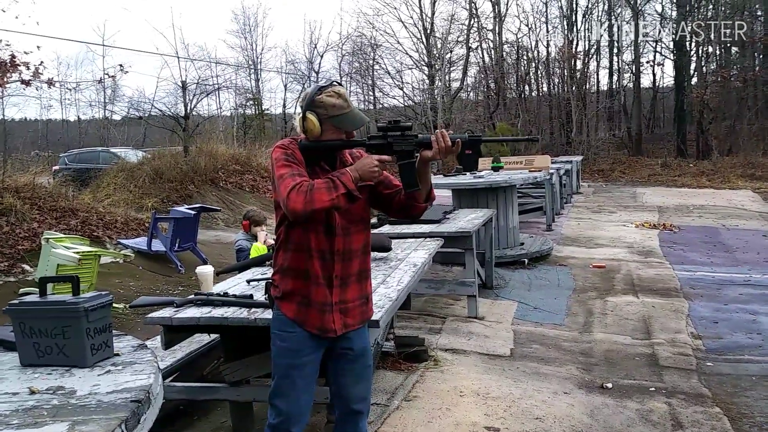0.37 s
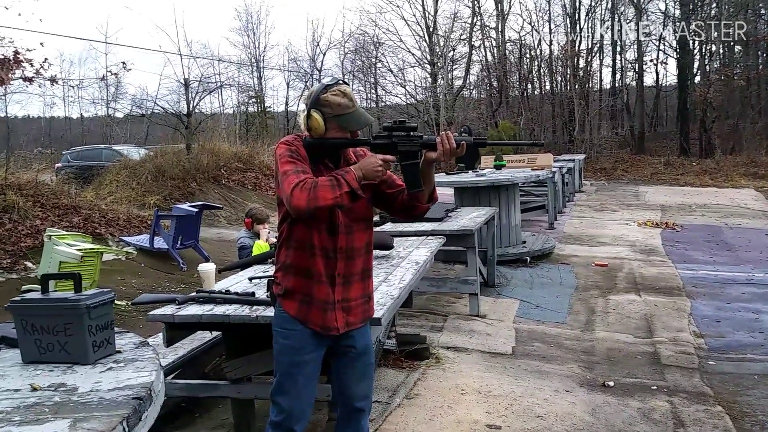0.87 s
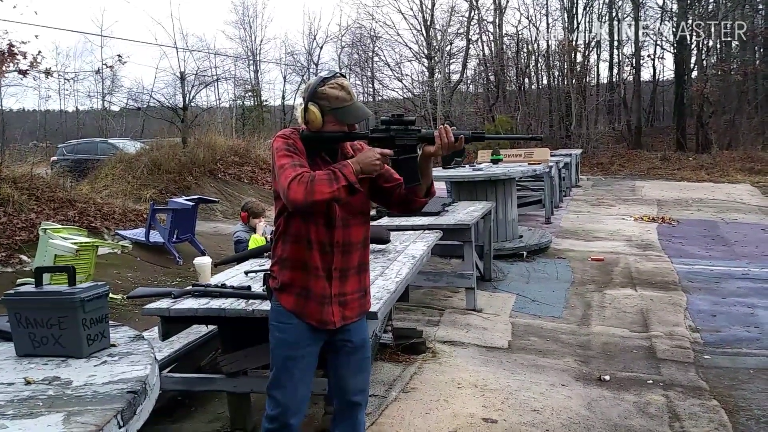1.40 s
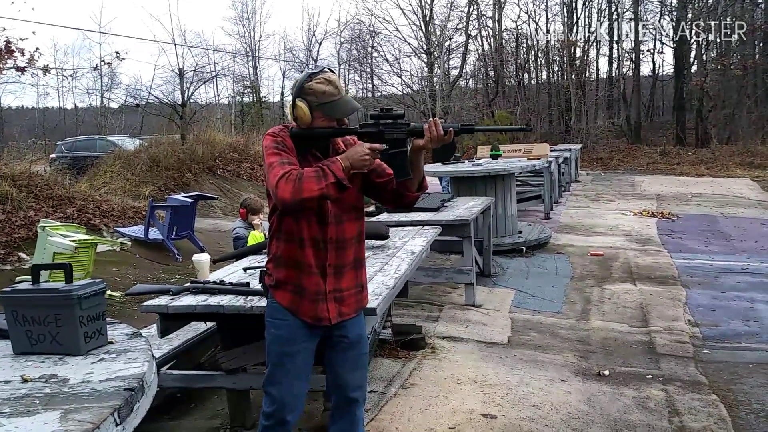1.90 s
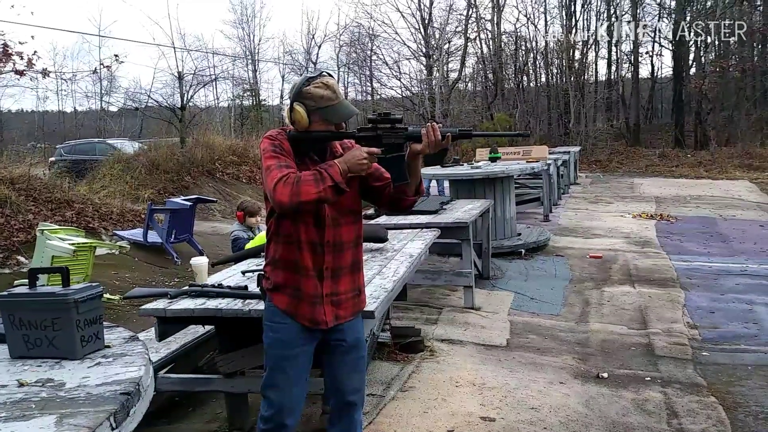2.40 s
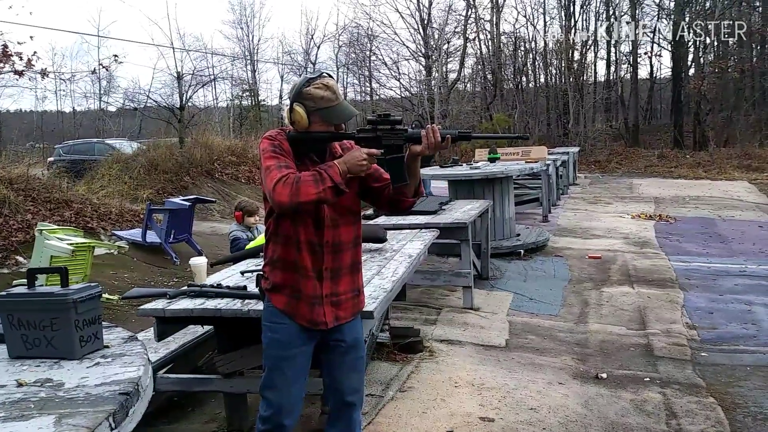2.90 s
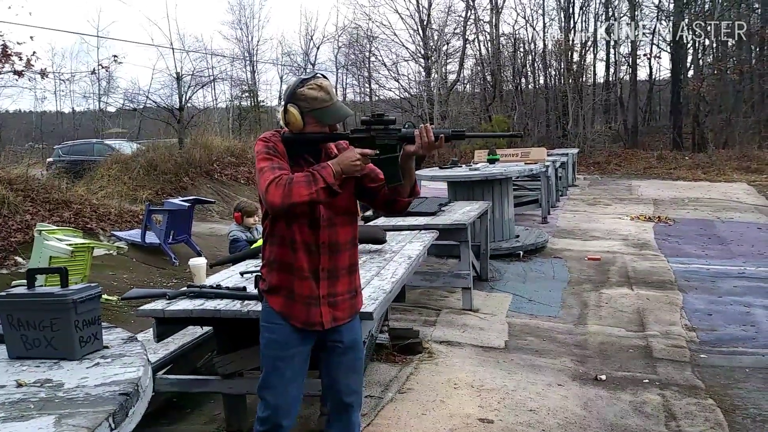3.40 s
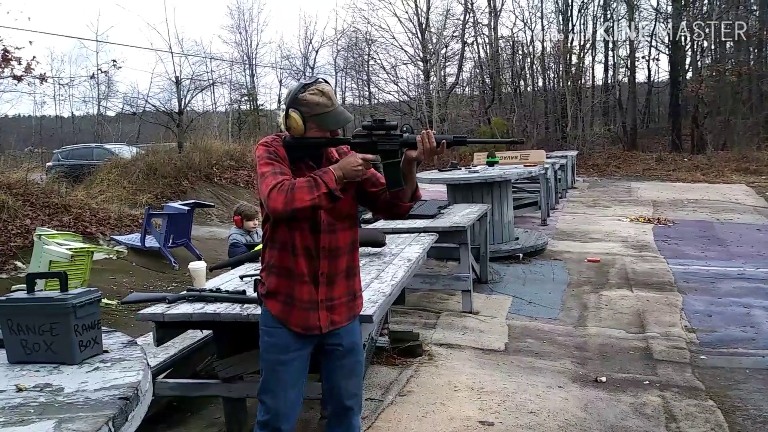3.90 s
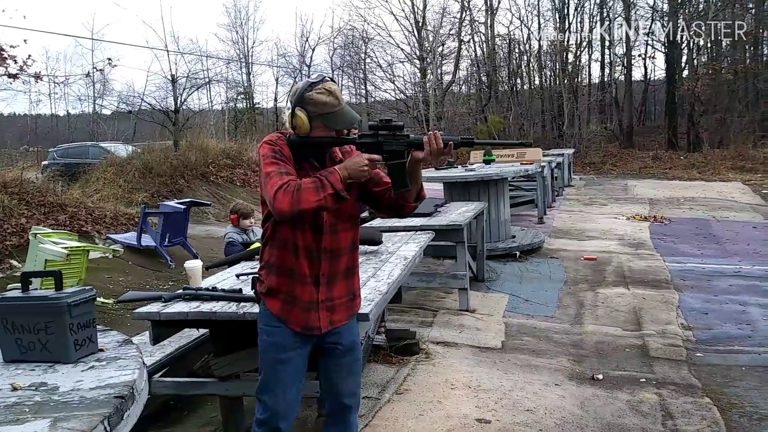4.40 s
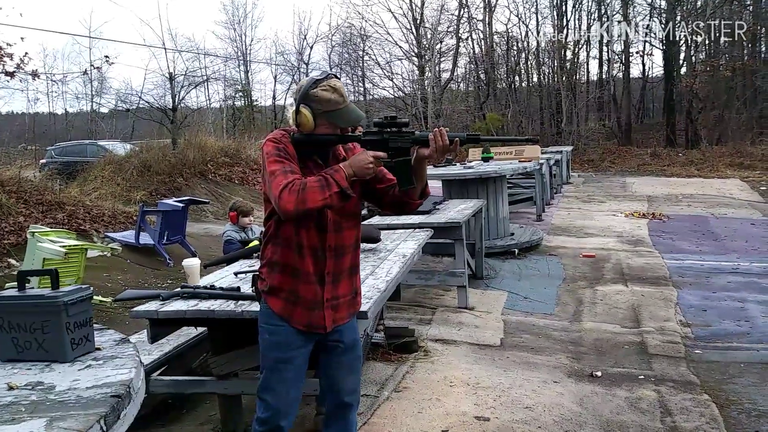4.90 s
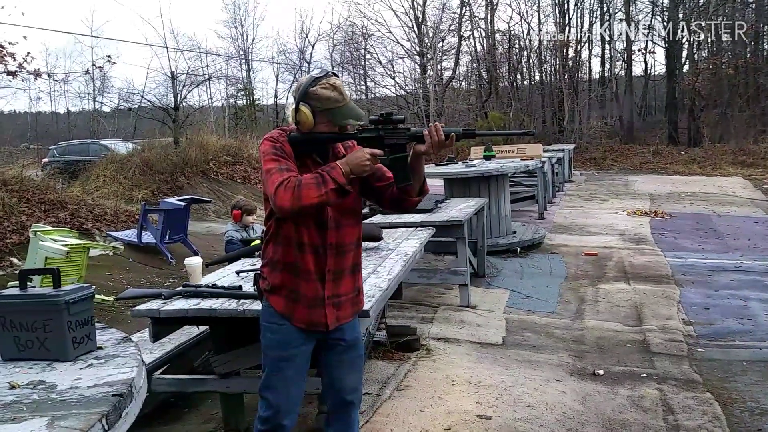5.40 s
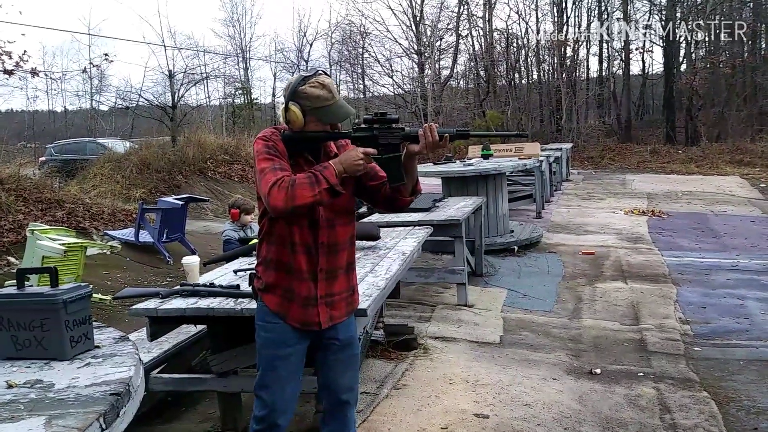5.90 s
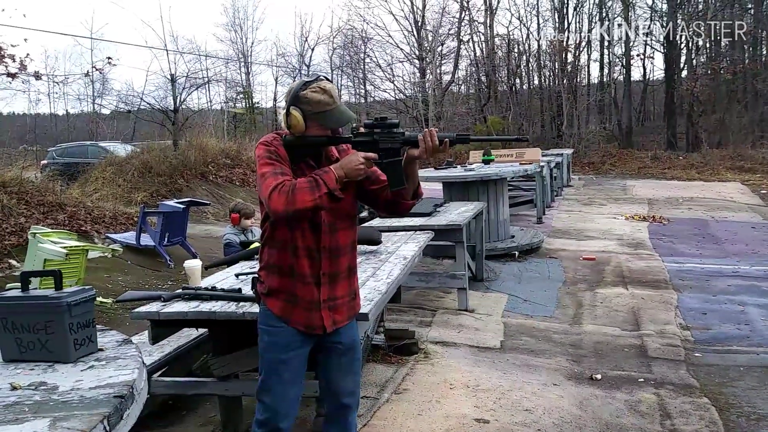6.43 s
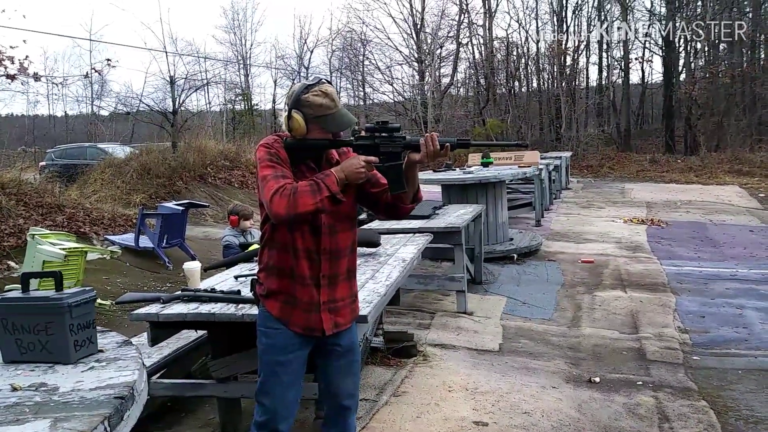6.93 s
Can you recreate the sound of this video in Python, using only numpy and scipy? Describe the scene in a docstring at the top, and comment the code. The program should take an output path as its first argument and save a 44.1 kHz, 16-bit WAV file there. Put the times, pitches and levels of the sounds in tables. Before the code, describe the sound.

Outdoors at a shooting range edged by woods, a rifle fires four separate shots, the last two close together. Each hard crack overloads the microphone, then rolls away as a throbbing, darkening echo off the trees. Small metal clicks and cloth rustles come before the first shot; ejected brass cases knock on a wooden bench and tick on concrete afterwards. Wind bumps the microphone softly over a faint distant wash.

```python
"""A rifle fires four times on an open range ringed by woods: a sharp pressure front, then shaped noise
as the long echo off the trees, duller the farther it has travelled. Brass cases land on bench and
concrete as noise ticks and ringing modes; metal clicks and cloth rustles come from the shooter.
Swells of low noise at the mono microphone are wind gusts and, under the shots, the deep part of the
blast; a far-off wash lies below, and two knocks fall close beside the microphone.
The blasts overload the microphone and a limiter holds the peaks."""
import sys
import numpy as np
from scipy import signal
from scipy.fft import rfft, irfft
from scipy.io import wavfile
from scipy.ndimage import uniform_filter1d, minimum_filter1d

SR = 44100
rng = np.random.default_rng(int(sys.argv[2]) if len(sys.argv) > 2 else 0)


def dump(signal):
    """Clip the signal to [-1, 1] and save it as 16-bit WAV at the path in sys.argv[1]."""
    limited = np.clip(np.atleast_2d(signal).T, -1, 1)
    pcm = np.round(limited * 32767).astype(np.int16)
    wavfile.write(sys.argv[1], SR, pcm)


def field_ratio(decibels):
    """Amplitude ratio for a level in dB (20 dB per decade); scalars and array-likes work."""
    return 10 ** (np.asarray(decibels, dtype=float) / 20)


N = 310895  # length in samples


def evened(x):
    """Scales to rms 1."""
    return x / np.sqrt(np.mean(x ** 2) + 1e-20)


def read(points, hz):
    """Reads a spectrum table on a log-frequency axis."""
    f, value = np.transpose(points)
    return np.interp(np.log(hz + 1), np.log(f + 1), value)


def add(mix, s, sound):
    """Mixes a sound in at s seconds, cut off at the end of the mix."""
    part = mix[round(s * SR):][:len(sound)]
    part += sound[:len(part)]


def coloured(x, points):
    """Filters by a spectrum, keeping the level of white noise."""
    gain = field_ratio(read(points, np.fft.rfftfreq(len(x), 1 / SR)))
    return irfft(rfft(x) * evened(gain), len(x))


def hump(x, centre, width):
    """A bell curve of height 1."""
    return np.exp(-.5 * ((x - centre) / width) ** 2)


def ring(modes, chance):
    """A blow sets off dying modes; chance puts each a little off in pitch and strength."""
    t = np.arange(SR // 3) / SR
    total = np.zeros(len(t))
    for (hz, db, t60), c in zip(modes, chance):
        decay = field_ratio(db + 2 * c - 60 * t / t60)
        total += decay * np.sin(2 * np.pi * hz * (1 + .002 * c) * t)
    return total * np.minimum(t / .0004, 1)


def burst(t60):
    """A rough contact: noise that dies fast, energy 1."""
    t = np.arange(SR // 20) / SR
    x = rng.standard_normal(len(t)) * field_ratio(-60 * t / t60) * np.minimum(t / 0.0012, 1)
    return x / np.linalg.norm(x)


# colour of the distant wash and the microphone hiss: f/Hz, relative level/dB per Hz
FAR_COLOUR = [(30, -31), (80, -10), (250, -6.5), (600, -2.5), (1500, -9.5), (2100, -15.5), (2800, -27.5),
              (6000, -28), (7800, -32.5), (9500, -32.5), (11500, -42), (15500, -38.5)]


def far():
    """A smooth far-off wash with the microphone's hiss: noise whose level swells slowly."""
    t = np.arange(N) / SR
    swell = np.zeros(N)
    for f in np.geomspace(.2, 3, 12):
        swell += np.sin(2 * np.pi * (f * t + rng.random())) / np.sqrt(f)
    level_db = -48 + 0.72 * evened(swell)
    return field_ratio(level_db) * coloured(rng.standard_normal(N), FAR_COLOUR)


# low-noise swells at the microphone, wind gusts and, under the shots, the deep part of the blast:
# start t/s, length t/s, level at the start/dB
LOW_SWELLS = [(0.01, 0.036, -38), (0.111, 0.1, -28.5), (0.261, 0.056, -32.5), (.345, 0.066, -37),
              (0.586, .03, -36), (0.627, 0.021, -21), (0.678, .06, -35), (0.954, 0.071, -46),
              (1.06, .03, -40.5), (1.108, .09, -38), (1.33, .19, -40.5), (1.551, .05, -38),
              (1.818, .04, -31), (2.28, 0.074, -36.5), (2.784, .14, -47.5), (2.993, .2, -40),
              (3.468, .03, -28), (3.82, .04, -42), (4.142, 0.14, -33), (4.299, .04, -28),
              (4.461, .03, -38.5), (4.558, 0.19, -29.5), (4.951, 0.25, -47), (5.303, .1, -50),
              (5.619, .03, -31), (5.875, 0.037, -37), (5.94, .09, -42), (6.058, 0.08, -36), (6.3, .05, -44),
              (6.59, .04, -33), (6.705, .03, -35.5)]


def low_level(t):
    """Low-noise level in dB: each swell rises fast, sags while it lasts and drops back to the calm."""
    calm_db = -56
    rise, sag, fall = 502.5, 24.5, 398.5  # dB per s; after the swell the fall adds to the sag
    power = field_ratio(2 * calm_db)
    for s, length, db in LOW_SWELLS:
        before, after = np.maximum(s - t, 0), np.maximum(t - s, 0)
        over = np.maximum(t - s - length, 0)
        power = power + field_ratio(2 * (db - rise * before - sag * after - fall * over))
    return 10 * np.log10(power)


# colour of the low noise at a level of -36 dB: f/Hz, relative level/dB per Hz
LOW_COLOUR = [(15, -38.5), (30, -22), (60, 2.5), (110, 1), (200, -9.5), (400, -28.5), (1000, -73),
              (3000, -110)]


def wind_and_blast_lows():
    """Wind gusts and the deep part of the blasts: lumpy low noise, stronger swells reaching higher."""
    frames, hz = N // 256 + 5, np.fft.rfftfreq(1024, 1 / SR)[:, None]
    a, b = rng.standard_normal((frames, 513, 2)).T
    swell_db = low_level(np.arange(frames) * 256 / SR)
    tilt_db = 0.29 * (swell_db + 36.0) * np.log2(np.clip(hz / 100, 1, 8))
    shape = field_ratio(read(LOW_COLOUR, hz) + tilt_db)
    shape = shape / np.linalg.norm(shape, axis=0)  # the colour alone leaves the level even
    noise = signal.istft((a + 1j * b) * shape, nperseg=1024, noverlap=768)[1][:N]
    lumps = uniform_filter1d(uniform_filter1d(rng.standard_normal(N), size=700), size=700)
    lumps_db = 3.7 * evened(lumps)
    level_db = np.interp(np.arange(N), np.arange(frames) * 256, swell_db)
    return evened(noise * field_ratio(lumps_db)) * field_ratio(level_db)


# cloth rustles: middle t/s, half length t/s, peak level/dB
CLOTH_TIMES = [(.43, 0.019, -64), (0.495, .025, -61), (.62, 0.03, -57), (1.26, .04, -66), (1.35, .03, -64)]
# colour of a rustle: f/Hz, relative level/dB per Hz
CLOTH_COLOUR = [(2500, -8.5), (4000, -9), (5300, -5), (7200, -10), (9200, -11), (10500, -18), (13000, -50)]
# small metal clicks of the action: t/s, level/dB
ACTION_TIMES = [(0.5107, -34), (0.6114, -48), (1.192, -47), (1.35, -57), (5.089, -37)]
# modes of a click: f/Hz, relative level/dB, 60 dB decay t/s
ACTION_MODES = [(1240, 4, 0.025), (3670, -22, .02), (5500, -8.5, .025), (7200, -11, .016),
                (8900, -11, .014)]


def shooter():
    """Cloth rustles as swells of noise; the action clicks as short modes with a noisy contact."""
    t = np.arange(N) / SR
    envelope = sum(field_ratio(db) * hump(t, s, half) for s, half, db in CLOTH_TIMES)
    out = coloured(rng.standard_normal(N), CLOTH_COLOUR) * envelope
    for s, db in ACTION_TIMES:
        chance = .4 * rng.standard_normal(len(ACTION_MODES))
        add(out, s, field_ratio(db) * ring(ACTION_MODES, chance))
        add(out, s, field_ratio(db + 3) * coloured(burst(0.027), CLOTH_COLOUR))
    return out


# echo from ever farther trees, the near woods then a far tree line: t/s after the blast, level/dB
ECHO_DECAY = [(0, 15), (.05, 16.5), (.1, 8), (.2, 4.5), (.31, -1.5), (.45, -7), (.6, -15.5), (.75, -22),
              (.87, -23), (1.0, -23), (1.2, -29), (1.58, -41.5), (2.2, -62.5)]
# band the trunks return best: f as a multiple of its centre, share of the boom lift
TRUNK_BAND = [(.56, 0), (.75, .6), (.88, 1), (1, 1.25), (1.15, .85), (1.32, .55), (1.46, 0), (1.8, -0.43),
              (2.25, 0.042)]
# the far tree line answers lower: t/s after the blast, centre of that band f/Hz
TRUNK_CENTRE = [(0, 636), (.75, 617), (.9, 490), (2.2, 522)]
# loss in the air, negative where the band gains: f/Hz, loss/dB per s of travel
AIR_LOSS = [(500, -3), (1500, -2), (3500, 5.5), (6500, 21), (9500, 43.5), (13000, 74), (16000, 90)]
# single strong reflectors: t/s after the blast, centre f/Hz, lift/dB, half length t/s
STRONG_REFLECTORS = [(0.039, 282, 2.5, .006), (0.083, 6050, 3, 0.0051), (0.105, 336, 6.5, 0.017),
                     (.146, 798, 5, 0.0036), (0.241, 7000, 5.5, 0.0045), (0.401, 338, 5.5, .015),
                     (0.897, 453, 0.5, 0.013), (1.0, 400, 1, .02), (0.926, 1500, 1.5, .03),
                     (1.096, 600, 4.5, 0.016), (1.186, 300.1, 4, 0.026), (1.601, 553, 3.5, .03)]


def woods():
    """Echo gain over frequency and delay: distance, air loss, lumps of trees, single reflectors."""
    hz, t = np.fft.rfftfreq(512, 1 / SR)[:, None], np.arange(800) * 128 / SR
    octave = np.log2(hz + 20)
    boom_db = 7.5 * (1 - np.exp(-t / 0.18))  # grows as the trunks take over
    bass_db = -5 * (1 - np.exp(-t / 0.26))  # the band near 300 Hz thins out
    centre = np.interp(t, *np.transpose(TRUNK_CENTRE))
    field_db = np.interp(t, *np.transpose(ECHO_DECAY))
    field_db = field_db + boom_db * np.interp(hz / centre, *np.transpose(TRUNK_BAND))
    field_db = field_db + bass_db * hump(octave, np.log2(310), 0.71)
    field_db = field_db + 2.5 / (1 + (hz / 130) ** 4)  # deep rumble
    field_db = field_db - read(AIR_LOSS, hz) * np.minimum(t, 1.3)
    # the crack leads, the body follows
    field_db = field_db - 11 * np.exp(-(t / .012) ** 2) / (1 + (hz / 1500) ** 4)
    for delay, centre_hz, lift_db, length in STRONG_REFLECTORS:
        field_db = field_db + lift_db * hump(t, delay, length) * hump(octave, np.log2(centre_hz), 0.72)
    lumps = uniform_filter1d(rng.standard_normal(field_db.shape), size=14, axis=0)
    lumps = uniform_filter1d(lumps, size=3, axis=1)
    # stands of trunks return the boom in throbs
    stands = uniform_filter1d(np.minimum(rng.exponential(1, len(t)), 2) - 1, size=2)
    throb_db = 2.35 * evened(stands) * hump(octave, np.log2(650), 0.29)
    return field_ratio(field_db + 1.1 * evened(lumps) + throb_db)


# muzzle blasts: t/s, level/dB on front and echo
SHOT_TIMES = [(1.6013, 2), (3.2557, 2), (5.4017, 2), (6.3690, 2.5)]
# colour of the blast at the microphone: f/Hz, relative level/dB per Hz
BLAST_COLOUR = [(20, -41), (50, -32), (150, -19.5), (240, -11.5), (370, -5.5), (600, -6.5), (1300, -7),
                (2300, -10), (3000, -16.5), (4500, -16), (6000, -11.5), (7500, -15.5), (9500, -15.5),
                (12000, -27), (15500, -33.5)]
# how far the echo repeats from shot to shot: f/Hz, amplitude share
REPEATED_SHARE = [(200, 0.9), (1000, 0.89), (4000, 0.22), (12000, .3)]
# modes of the hammer fall: f/Hz, level/dB, 60 dB decay t/s
HAMMER_MODES = [(1300, -30.5, .008), (3775, -20, 0.013), (5516, -15, .008), (7220, -20.5, .007),
                (9240, -26, .006)]


def shots():
    """Hammer fall, pressure front, echo; the same trees answer each shot, the treble less alike."""
    field, out = woods(), np.zeros(N)
    same = np.clip(read(REPEATED_SHARE, np.fft.rfftfreq(512, 1 / SR)), 0, 1)[:, None]
    a, b = rng.standard_normal((len(SHOT_TIMES) + 1, *field.shape[::-1], 2)).T
    z = (a + 1j * b) / np.sqrt(512 * 4 / 3)  # brings the noise to about unit level
    for k, (s, db) in enumerate(SHOT_TIMES):
        noise = same * z[..., 0] + np.sqrt(1 - same ** 2) * z[..., k + 1]
        echo = signal.istft(field * noise, nperseg=512, noverlap=384)[1]
        echo = coloured(echo, BLAST_COLOUR)[:2 * SR]
        echo = echo * np.minimum(np.linspace(20, 0, 2 * SR), 1)
        u = np.arange(len(echo)) / SR / 0.00024  # time in units of the 0.24 ms positive phase
        front = field_ratio(0.5) * (1 - u) * np.exp(-u)  # overpressure, then a dip below rest
        add(out, s, field_ratio(db) * (echo * np.minimum(u / 3.6, 1) ** 2 + front))
        lead_s = .0083  # the hammer falls this long before the blast
        rattle = field_ratio(-29.5) * coloured(rng.standard_normal(round(lead_s * SR)), BLAST_COLOUR[4:])
        add(out, s - lead_s, ring(HAMMER_MODES, rng.standard_normal(len(HAMMER_MODES))))
        add(out, s - lead_s, rattle)
    return out


# a case lands on the wooden bench: t/s, knock level/dB, upper ring level/dB
BENCH_LANDINGS = [(2.5281, -13, -46), (2.605, -39, -80), (2.682, -27, -70), (6.298, -4.5, -64),
                  (6.331, -32, -75)]
# modes of the bench: f/Hz, relative level/dB, 60 dB decay t/s
BENCH_MODES = [(1013, 3.5, 0.01), (1230, -3.5, 0.01), (1720, 1.5, 0.012), (1960, -15, 0.0062),
               (2850, -2.5, 0.005), (3580, -8.5, 0.007), (4000, -13, 0.006), (5000, -15, 0.0057)]
# a case lands on concrete: t/s, tick level/dB, lower ring level/dB, upper ring level/dB
CONCRETE_LANDINGS = [(2.822, -46, -69, -60), (2.865, -40, -80, -68), (5.947, -38, -47, -50),
                     (5.962, -17, -50, -46), (5.990, -55, -46, -58), (6.060, -55, -59, -64)]
# landings without a ring: t/s, tick level/dB
DULL_LANDINGS = [(2.5125, -26), (4.150, -35), (4.227, -27), (4.375, -40), (6.213, -35)]
# colour of the contact tick: f/Hz, relative level/dB per Hz
TICK_COLOUR = [(1500, -20), (3000, -11), (5500, 3), (7500, -2), (10200, -2), (12000, -18), (15500, -26)]
# lower modes of the brass tube: f/Hz, relative level/dB, 60 dB decay t/s
LOWER_RING = [(10900, -12, .35), (11870, -6, .16), (11900, 1, 0.18)]
# upper modes of the brass tube: f/Hz, relative level/dB, 60 dB decay t/s
UPPER_RING = [(15310, 0, .25), (15380, -9, .2)]


def cases():
    """A landing ticks; bench hits also knock the wood, and all but dull ones ring the brass tube."""
    out, chatter = np.zeros(N), np.zeros(96)
    chatter[[0, 47, 94]] = .6, 1, .7  # the case chatters, a millisecond between contacts
    ticks = list(DULL_LANDINGS)
    for s, db, high_db in BENCH_LANDINGS:
        wood_chance, brass_chance = rng.standard_normal((2, len(BENCH_MODES)))
        knock = signal.lfilter(chatter, 1, ring(BENCH_MODES, 1.1 * wood_chance))
        add(out, s, field_ratio(db) * knock + field_ratio(high_db) * ring(UPPER_RING, brass_chance))
        ticks.append((s, db + 0.5))
    for s, tick_db, low_db, high_db in CONCRETE_LANDINGS:
        low_chance, high_chance = rng.standard_normal((2, len(LOWER_RING)))
        add(out, s, field_ratio(low_db) * ring(LOWER_RING, low_chance))
        add(out, s, field_ratio(high_db) * ring(UPPER_RING, high_chance))
        ticks.append((s, tick_db))
    for s, db in ticks:
        add(out, s, field_ratio(db) * coloured(burst(0.027), TICK_COLOUR))
    return out


# knocks beside the microphone: t/s, level/dB
KNOCK_TIMES = [(3.7588, 12), (6.884, -8)]
# modes of the microphone's housing: f/Hz, relative level/dB, 60 dB decay t/s
HOUSING_MODES = [(530, 0, .022), (385, -5.5, .04), (275, -13.5, 0.11)]


def knocks():
    """Knocks close beside the microphone ring its housing in low modes, the same each time."""
    out = np.zeros(N)
    for s, db in KNOCK_TIMES:
        add(out, s, field_ratio(db) * ring(HOUSING_MODES, np.zeros(len(HOUSING_MODES))))
    return out


def scene():
    """Everything on the range reaches one microphone, laid alike on two channels."""
    mono = far() + wind_and_blast_lows() + shooter() + shots() + cases() + knocks()
    return np.tile(mono, (2, 1))


CEILING_DB = -1.3  # level the limiter holds, dB re full scale
# after the capsule, bass cut and a slight treble loss: f/Hz, level/dB
AFTER_CAPSULE = [(15, -16.5), (40, -2.5), (90, -0.5), (2200, -0.5), (3200, -0.5), (6000, -1), (8000, -3),
                 (16000, -2)]


def microphone(pressure):
    """The capsule saturates softly on loud sound; then come a bass cut and a slight treble loss."""
    top = field_ratio(CEILING_DB + 9.5)  # 9.5 dB of headroom over the limiter
    clipped = top * np.tanh(pressure / top)
    return irfft(rfft(clipped) * field_ratio(read(AFTER_CAPSULE, np.fft.rfftfreq(N, 1 / SR))), N)


def limiter(x):
    """Gain drops just ahead of a peak and recovers at a steady 120 dB per s."""
    fall = np.arange(N) * 120 / SR
    peak_db = 20 * np.log10(abs(x) + 1e-9)
    held_peak_db = np.maximum.accumulate(peak_db + fall) - fall
    over_db = np.maximum(held_peak_db - CEILING_DB, 0)
    ahead_db = -minimum_filter1d(-over_db, size=33)  # looks a moment ahead
    return x / field_ratio(uniform_filter1d(ahead_db, size=33))


def roll_off(x):
    """The treble ends steeply here."""
    return signal.sosfilt(signal.butter(12, 16440, fs=SR, output="sos"), x)


def record(dry):
    """One microphone into the limiter, then a low-pass at 15.7 kHz, on two equal channels."""
    held = limiter(microphone(dry[0]))
    held = signal.oaconvolve(held, signal.firwin(255, 15700, fs=SR), "same")
    mix = np.tile(held, (2, 1))
    return roll_off(mix)


dry = scene()
out = record(dry)
dump(out)
```